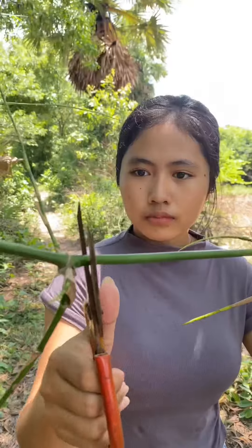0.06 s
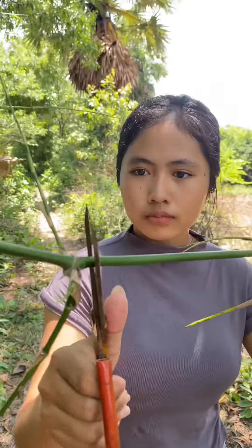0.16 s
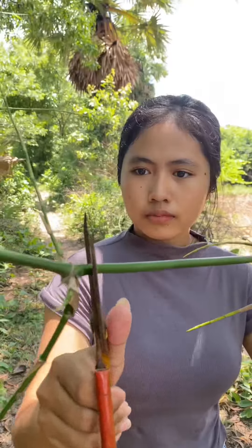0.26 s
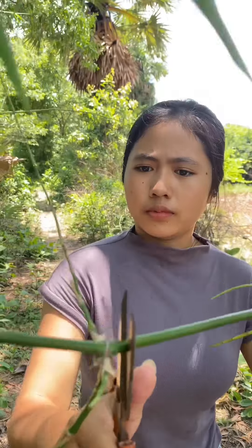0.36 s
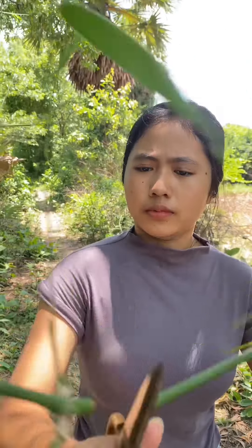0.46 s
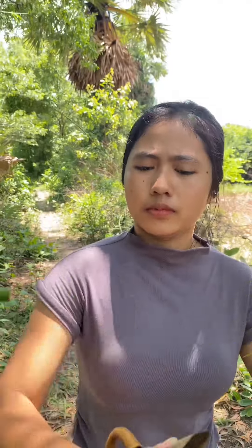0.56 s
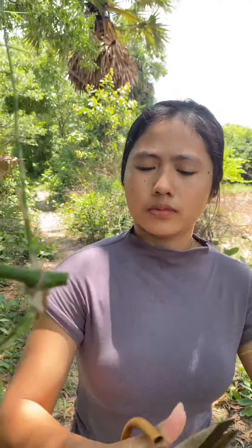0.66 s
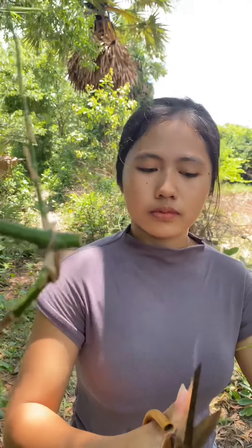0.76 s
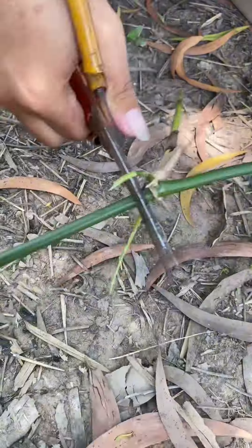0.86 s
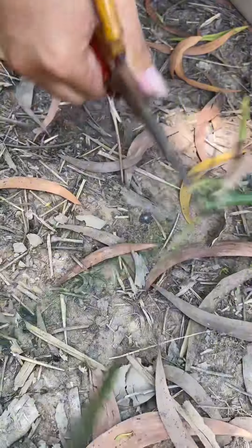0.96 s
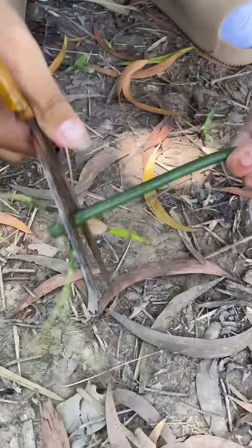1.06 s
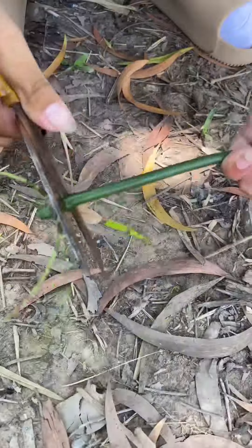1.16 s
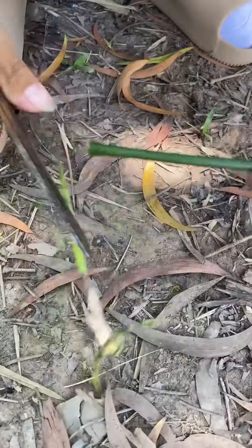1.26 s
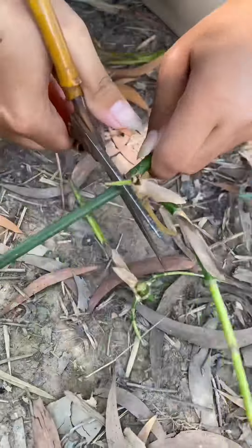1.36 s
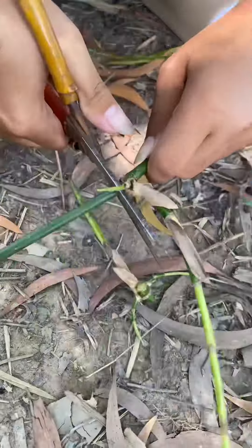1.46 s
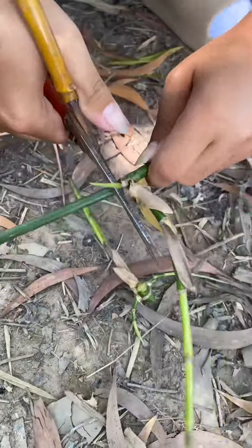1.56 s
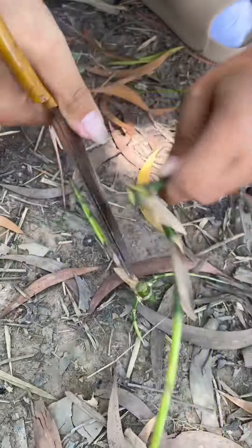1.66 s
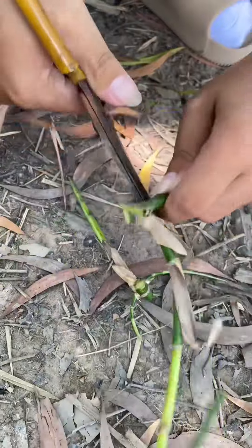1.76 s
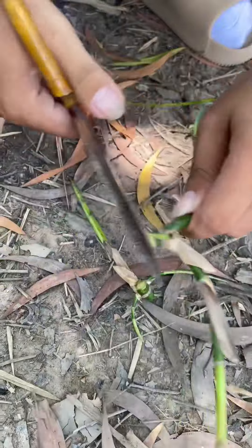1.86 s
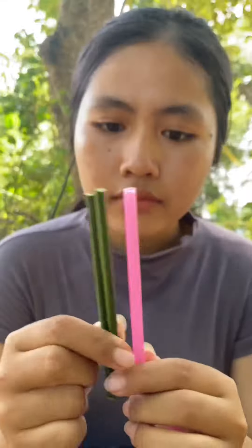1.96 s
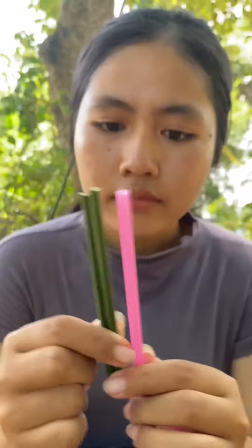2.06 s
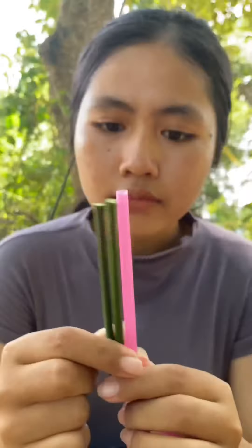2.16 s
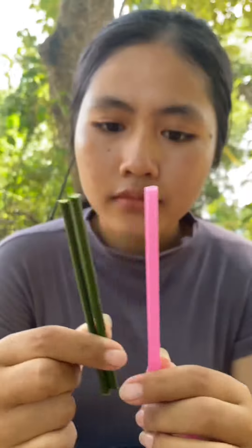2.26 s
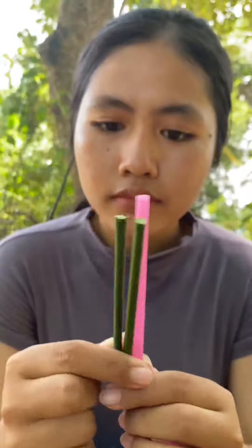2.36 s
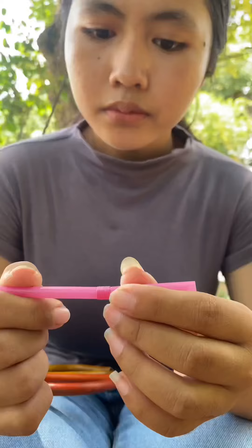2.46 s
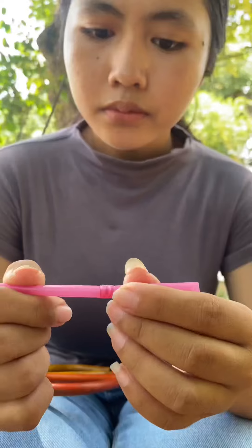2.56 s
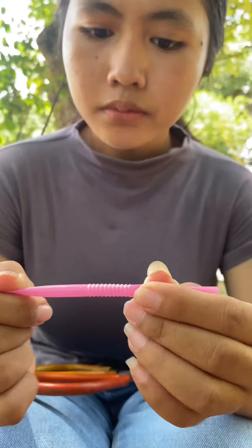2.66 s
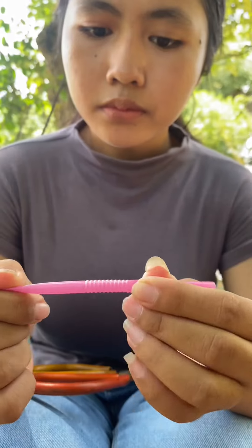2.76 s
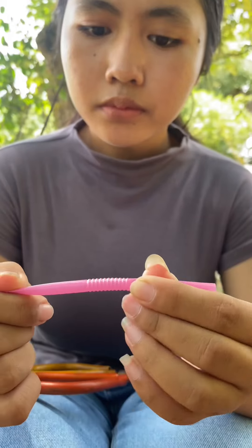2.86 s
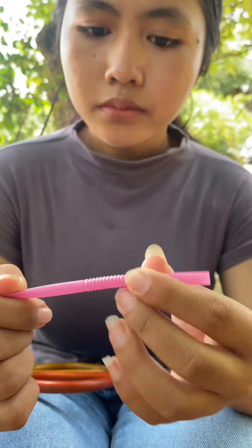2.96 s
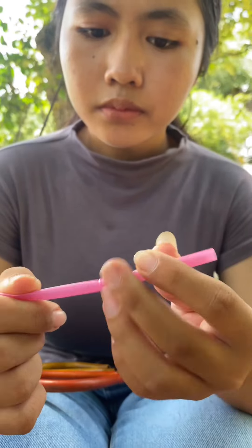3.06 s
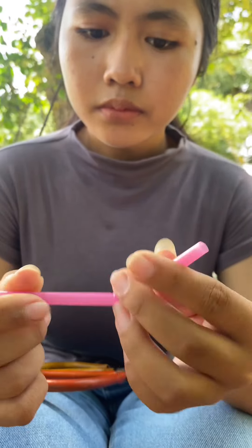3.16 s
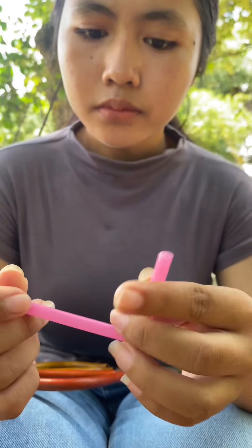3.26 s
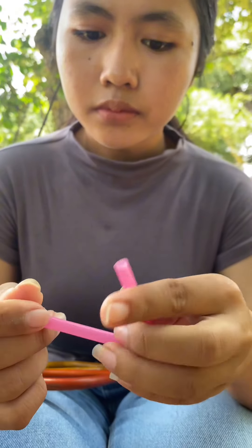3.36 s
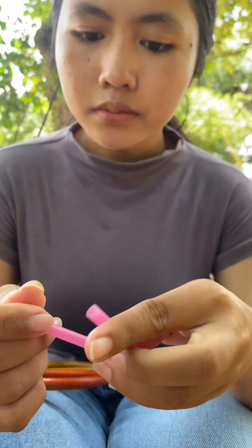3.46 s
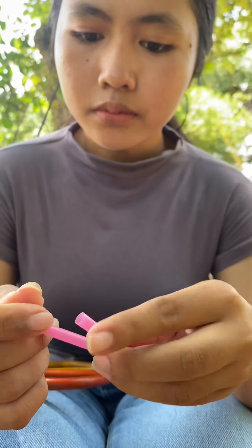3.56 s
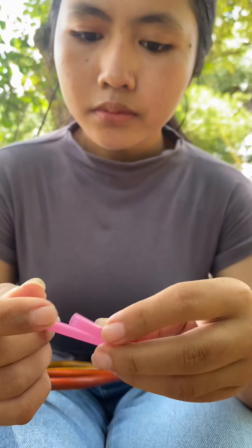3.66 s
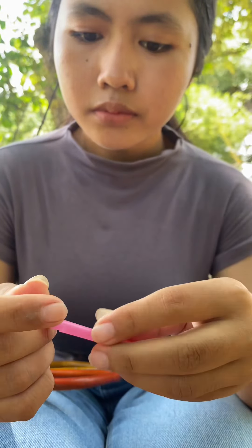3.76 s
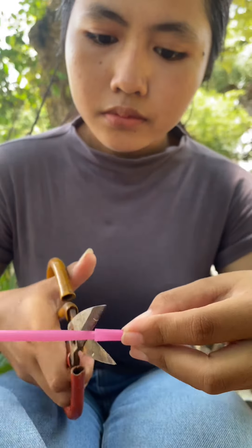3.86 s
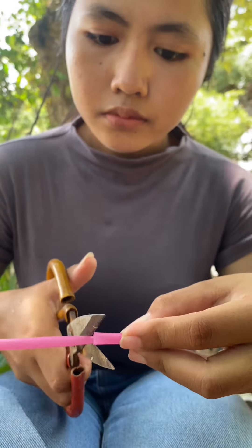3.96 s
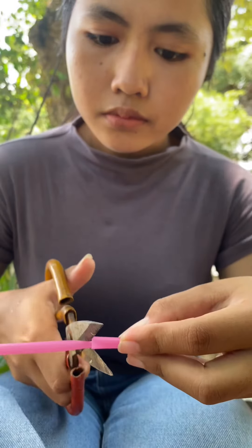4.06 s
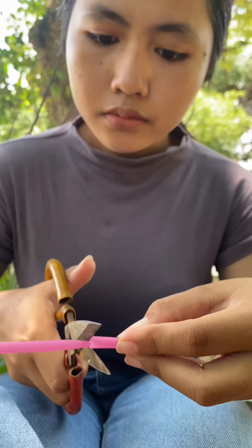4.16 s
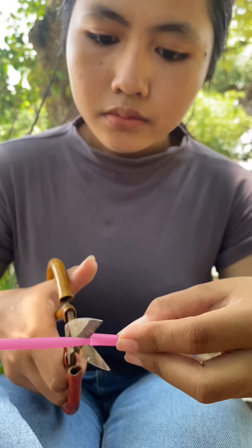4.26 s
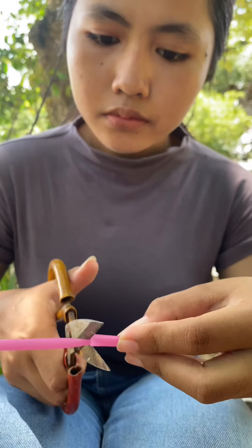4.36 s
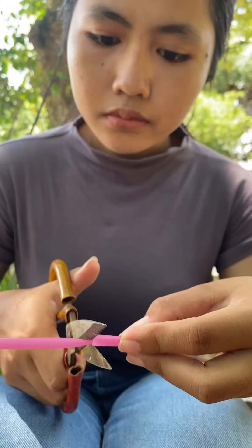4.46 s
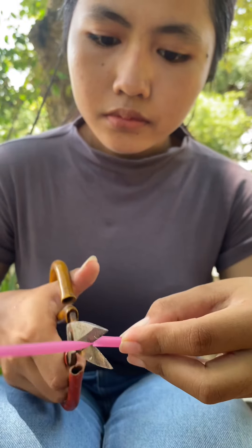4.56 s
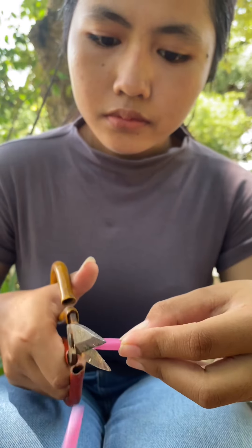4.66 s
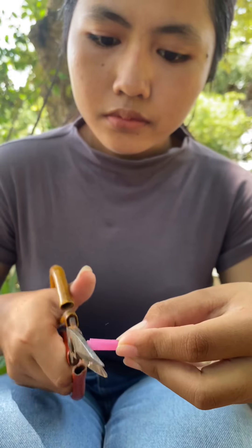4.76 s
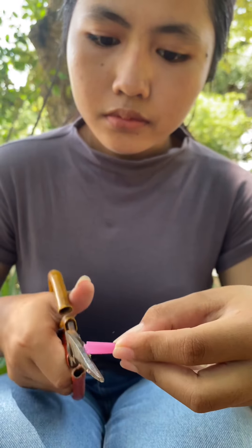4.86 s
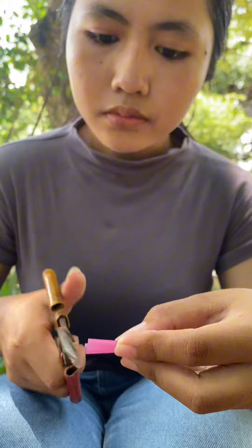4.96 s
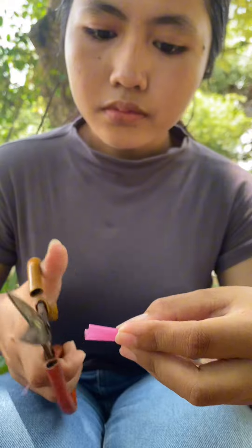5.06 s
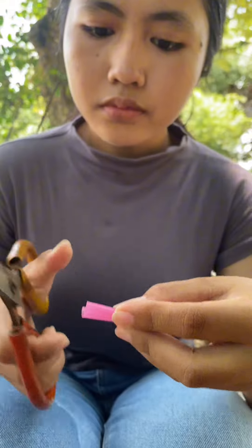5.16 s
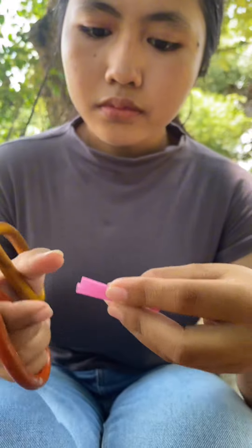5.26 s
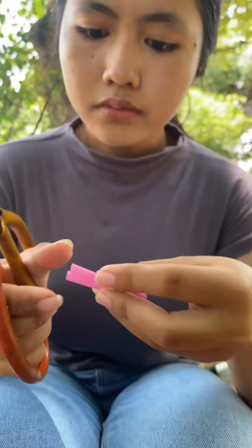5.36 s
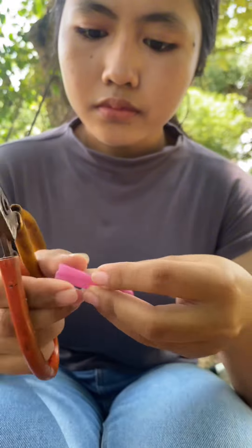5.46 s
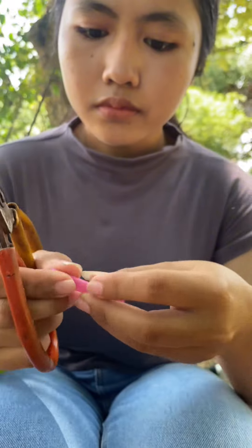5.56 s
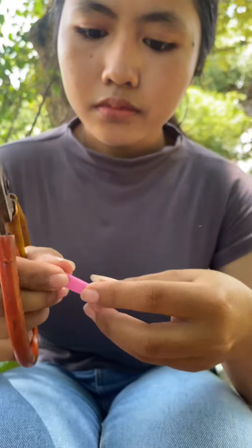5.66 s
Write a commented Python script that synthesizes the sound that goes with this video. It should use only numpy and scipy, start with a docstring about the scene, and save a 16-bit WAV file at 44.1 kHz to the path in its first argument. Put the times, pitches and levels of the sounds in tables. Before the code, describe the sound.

Four loud, dry snips with fibre crackle, brief steel ring and small low thuds come first, amid scratching dry leaves. Hollow finger taps follow, then a rapid plastic ratcheting burst, a quiet pause and two close straw cuts, the first bright and ringing, the second weaker. Close stereo phone pickup in open woodland, faint scatter from trees, gentle wind buffeting and one distant chirp.

```python
"""Shears in the forest

Close to a phone in a forest, hand shears snip four times through a green stem: fibre noise, cracks, steel tones, a thud.
Twigs and dry leaves tick and rustle as bursts and fading noise; the hinge slips; stem and straw tap in the fingers.
A plastic straw's pleats rip open in ringing pops, then the shears cut it twice and the pieces ring like pipes.
Light wind rumbles on the microphone ports over leaf hiss and a murmur, all shaped noise.
A far bird, a rough gliding tone, chirps once."""
import sys
import numpy as np
from scipy import signal
from scipy.fft import rfft, irfft
from scipy.io import wavfile
from scipy.ndimage import uniform_filter1d

SR = 44100
rng = np.random.default_rng(int(sys.argv[2]) if len(sys.argv) > 2 else 0)


def wav_out(sig):
    """Save sig, one row per channel (or a flat mono array), as 16-bit PCM at SR to the path in sys.argv[1]."""
    wavfile.write(sys.argv[1], SR, np.round(np.clip(np.atleast_2d(sig).T, -1, 1) * 32767).astype(np.int16))


N = 251483


def amp(db):
    """Amplitude factor of a level in dB."""
    return 10 ** (np.asarray(db) / 20)


def unit_rms(x):
    """Scales a signal to a root mean square of one."""
    return x / np.sqrt(np.mean(x ** 2) + 1e-20)


def read(points, hz, column=1):
    """Reads a table column at any frequency, straight between points on a log frequency axis."""
    columns = np.transpose(points)
    return np.interp(np.log(hz + 1), np.log(columns[0] + 1), columns[column])


def add(mix, s, sound):
    """Adds a sound into the mix at a time in seconds, cut off at the end."""
    part = mix[..., round(s * SR):][..., :sound.shape[-1]]
    part += sound[..., :part.shape[-1]]


def colour(x, points, tilt_db=0.):
    """Imposes a spectrum, tilted per octave about 4 kHz, as a causal filter, and keeps the power."""
    hz = np.fft.rfftfreq(len(x), 1 / SR)
    log_gain = np.log(amp(read(points, hz) + tilt_db * np.log2(hz / 4000 + .01)))
    # folding the cepstrum onto positive times gives minimum phase
    fold = irfft(log_gain, len(x))
    fold[1:len(x) // 2] *= 2
    fold[len(x) // 2 + 1:] = 0
    y = irfft(rfft(x) * np.exp(rfft(fold)), len(x))
    return y * np.sqrt(np.mean(x ** 2) / (np.mean(y ** 2) + 1e-30))


def ring(modes, t):
    """Decaying sines with chance starting phase, softened over the first instant."""
    tones = sum(amp(db - 60 * t / t60) * np.sin(2 * np.pi * (hz * t + rng.random()))
                for hz, db, t60 in modes)
    return tones * (1 - np.exp(-t / 0.000037))


def uneven_noise(count, grain_db, width):
    """White noise whose level wanders by chance over a width in samples."""
    grain = unit_rms(uniform_filter1d(rng.standard_normal(count), size=width))
    return rng.standard_normal(count) * amp(grain_db * grain)


def burst(t, decay_s):
    """A quick puff of uneven noise; its energy is set by the decay, not by chance."""
    shape = np.exp(-t / max(decay_s, 1e-4)) * (1 - np.exp(-t / .0001))
    puff = shape * uneven_noise(len(t), grain_db=3.0, width=12)
    return puff * np.linalg.norm(shape) / np.linalg.norm(puff) / 2


def bed(points, patchy_db):
    """Steady noise with drifting patches in time and pitch."""
    frames, hz = N // 256 + 5, np.fft.rfftfreq(1024, 1 / SR)
    real, imaginary, patches = rng.standard_normal((frames, 513, 3)).T
    patches = uniform_filter1d(patches, size=14, axis=0)  # along pitch
    patches = unit_rms(uniform_filter1d(patches, size=10, axis=1))  # along time
    spectrum = (real + 1j * imaginary) * amp(read(points, hz)[:, None] + patchy_db * patches)
    return unit_rms(signal.istft(spectrum, nperseg=1024, noverlap=768)[1][:N])


def stereo(mid, side):
    """Places the mid a little to the right and adds the side with opposite signs."""
    return amp([[-1.9], [1.9]]) * mid + np.array([side, -side])


def drift():
    """Slow chance swells of the background level, 1.5 to 10 a second."""
    t = np.arange(N) / SR
    swells = sum(np.sin(2 * np.pi * (hz * t + rng.random())) / np.sqrt(hz)
                 for hz in np.geomspace(1.5, 10, num=16))
    return amp(1.1 * unit_rms(swells))


# background around the phone, before drift and left-right balance; each row holds until the next:
# (time [s], leaf hiss level [dB], murmur level [dB])
BACKGROUND = [(0, -68.5, -68), (0.842, -65, -73), (1.24, -67, -72.5), (1.88, -59.5, -62.5),
              (2.492, -68, -69.5), (4.901, -70.5, -71)]


def background(column):
    """Steady level of hiss or murmur, gliding quickly from each step to the next."""
    start = np.transpose(BACKGROUND)[0]
    step = np.maximum(np.searchsorted(start, np.arange(N) / SR, "right") - 1, 0)
    level_db = np.transpose(BACKGROUND)[column][step]
    return amp(uniform_filter1d(level_db, round(0.014 * SR)))


# spectrum of the leaves around the phone: (frequency [Hz], relative density [dB])
LEAVES = [(650, -37), (1100, -8.5), (2800, -6), (3800, -6.5), (7150, -11), (10300, -16), (11300, -39),
          (14000, -72)]
# spectrum of their left-right part: (frequency [Hz], relative density [dB])
LEAVES_SIDE = [(650, -26.5), (1100, 1.5), (1520, -7.5), (2730, -1.5), (3730, -8.5), (11700, -11),
               (16000, -19)]


def leaves():
    """Leaf hiss is wide patchy noise; rustling adds to it in power, and the side is its own noise."""
    level = np.hypot(background(column=1) * drift(), rustle())
    return stereo(level * bed(LEAVES, 1.4), level * bed(LEAVES_SIDE, 1.5))


# spectrum of the low murmur of the woods: (frequency [Hz], relative density [dB])
MURMUR = [(140, -28.5), (230, -9.5), (376, -3), (468, -7), (624, -7), (1400, -13.5), (1820, -43),
          (3080, -120)]


def murmur():
    """The murmur is wide low noise, joined by the low part of each rustle."""
    level = np.hypot(background(column=2) * drift(), amp(-12.5) * rustle())
    return stereo(level * bed(MURMUR, 1.2), amp(4.5) * level * bed(MURMUR, 1.4))


# wind at the microphone, before left-right balance: (time [s], level [dB])
GUSTS = [(0, -58.5), (.8, -58.5), (.85, -51), (.95, -54), (1.1, -50), (1.15, -55), (1.27, -63), (1.34, -52),
         (1.5, -56), (1.63, -50), (1.7, -46), (1.76, -60.5), (1.84, -49), (1.9, -57.5), (1.98, -41.5),
         (2.1, -51.5), (2.35, -53.5), (2.5, -56.5), (5.7, -57)]
# spectrum of the wind on the ports: (frequency [Hz], relative density [dB])
WIND = [(12, -59.5), (20, -44), (25, -33), (40, -10.5), (70, 7.5), (103, -7), (140, -4), (184, -12.5),
        (330, -18.5), (430, -43), (730, -120)]


def wind():
    """Wind on the ports is low rumbling noise that follows the gusts, with a weaker side of its own."""
    time, level_db = np.transpose(GUSTS)
    level = amp(np.interp(np.arange(N) / SR, time, level_db))
    return stereo(level * bed(WIND, 1.3), amp(-10) * level * bed(WIND, 1.3))


# the two microphone ports, for near sounds; the scatter is scaled by clutter and chance:
# (frequency [Hz], left lead [rad], left minus right [dB], scatter [rad])
PORTS = [(100, 0.66, -0.5, 1), (391, .5, -7, 3.57), (850, 1.5, 3, 1.97), (1976.4, -0.64, -2, 1.43),
         (3520, 2, -2, 2.5), (5710, 1.09, -2.5, -1.86), (8900, 0.93, 3, 2.8), (11550, 1.5, 1, -0.6),
         (12900, 4, 0, -0.4)]


def ports(near, clutter):
    """Two ports a finger apart: treble arrives shifted; clutter near the source scrambles the shift."""
    hz = np.fft.rfftfreq(N, 1 / SR)
    lead, pan_db, scatter = (read(PORTS, hz, column=k) for k in (1, 2, 3))
    wobble = np.interp(hz, np.arange(60) * SR / 120, rng.standard_normal(60))
    turn = amp(pan_db / 2) * np.exp(.5j * (lead + clutter * scatter * wobble))
    return irfft(rfft(near) * np.array([turn, 1 / turn]), N)


# dry scratches of twigs, leaves and handles close by:
# (time [s], level [dB], strongest frequency [Hz], decay constant [s])
SCRATCHES = [(0.348, -50, 7000, 0.0078), (0.514, -40, 4660, 0.004), (0.733, -45.5, 5050, 0.0066),
             (0.971, -33, 6100, 0.0085), (.992, -42, 6440, 0.0032), (1.026, -44, 6000, 0.0062),
             (1.057, -36.5, 1010, 0.0014), (1.084, -44, 7100, 0.0027), (1.202, -29.5, 6500, 0.0032),
             (1.235, -34, 1860, 0.0047), (1.335, -35, 7040, 0.012), (1.384, -40.5, 7400, 0.0022),
             (1.406, -33.5, 7000, 0.0026), (1.346, -41, 6000, 0.0065), (1.616, -43.5, 7100, 0.022),
             (1.681, -37, 6000, 0.0074), (1.687, -32, 5440, 0.0077), (1.696, -31, 5570, 0.0086),
             (1.759, -47.5, 4800, 0.016), (1.809, -47.5, 5400, 0.016), (1.839, -40.5, 7500, 0.0073),
             (1.86, -23, 7450, 0.0032), (1.869, -30, 5500, 0.0144), (2.077, -38.5, 5660, 0.0042),
             (2.295, -42, 2800, 0.0056), (2.332, -50, 900, 0.0079), (2.438, -48, 640, 0.013),
             (2.756, -43.5, 694, 0.0072), (2.8, -50.5, 4000, .008), (2.982, -52, 6120, 0.0069),
             (3.081, -32.5, 6300, 0.0013), (4.611, -31.5, 1480, 0.0021), (4.886, -43, 5000, 0.0075),
             (4.901, -45, 4970, 0.0055), (5.2, -52, 3000, 0.0055), (5.248, -52.5, 2900, 0.0035),
             (5.398, -50, 5050, .003), (5.568, -46, 7330, 0.0032)]


def scratches():
    """Each dry scratch is a noise burst about one frequency, dulling by 6.5 dB an octave above it."""
    out, t = np.zeros(N), np.arange(2048) / SR
    for s, db, hz, decay_s in SCRATCHES:
        treble_db = -6.5 * np.log2(8500 / hz)
        spectrum = [(100, -44), (min(hz / 2, 1200), -9), (hz, 0), (8500, treble_db),
                    (11000, treble_db - 1.5), (16000, treble_db - 23.0)]
        add(out, s, amp(db) * colour(burst(t, decay_s), spectrum))
    return out


# stem cuts close to the phone; the hum is relative to the crush:
# (blades bite [s], stem parts [s], crush level [dB], tail level [dB], tail t60 [s],
#  thud level [dB], steel hum [dB])
CUTS = [(0.402, 0.423, -24, -27, 0.059, -34.5, 2.5), (0.886, 0.9105, -22, -35, 0.014, -17, -12.5),
        (1.169, 1.194, -21.5, -34.5, 0.018, -19, -11), (1.635, 1.664, -17, -24.5, 0.03, -21, -17)]
# lowest steel tone of each cut, as the grip varies: (frequency [Hz])
GRIP_HZ = [2450, 2150, 2170, 2180]
# spectrum of crushed and cracking fibre: (frequency [Hz], relative density [dB])
FIBRE = [(80, -53.5), (290, -20), (500, -12.5), (780, -1.5), (1100, -13.5), (1530, -10.5), (2330, -5.5),
         (2770, -3.5), (3390, -5), (6060, 0.5), (7210, -3.5), (7860, -1), (11100, -8), (12700, -14),
         (15100, -17), (16000, -26)]
BLADE_T60_S = .011  # of the lowest steel tone
THUD_START_HZ, THUD_SINK_S = 301.17, 0.0072  # the pitch halves after the sink time


def stem_cuts():
    """Fibres crush louder as the blades close and hum through the steel; a sinking thud ends each cut."""
    out, t = np.zeros(N), np.arange(4096) / SR
    thud_turns = THUD_START_HZ * THUD_SINK_S * np.log(1 + t / THUD_SINK_S)
    # the thud sinks in pitch as the stem swings free
    thud = np.sin(2 * np.pi * thud_turns) * np.exp(-t / 0.0018)
    for (bite, part, crush_db, tail_db, t60, thud_db, hum_db), grip_hz in zip(CUTS, GRIP_HZ):
        closing = np.clip(t / (part - bite), 0, 1)
        crush = amp(crush_db) * closing ** 2.1
        tail = amp(tail_db - 60 * (t - part + bite) / t60)
        shape = np.where(closing < 1, crush, tail)
        fibres = uneven_noise(len(t), grain_db=4.5, width=25)
        blade = ring([(grip_hz, 0, BLADE_T60_S)], t)
        hum = signal.fftconvolve(unit_rms(fibres) * shape, blade / np.linalg.norm(blade))
        add(out, bite, colour(fibres, FIBRE) * shape + amp(hum_db) * hum[:len(t)])
        add(out, part + 0.00021, amp(thud_db) * thud)
    return out


# foliage and fingers rustle on after a movement: (peak time [s], peak level [dB], t60 [s])
RUSTLES = [(.43, -56, 1.64), (0.872, -58.5, 0.96), (1.05, -58, 0.15), (1.171, -48.5, 0.26),
           (1.68, -59.5, 0.49), (2.681, -62, 0.7), (3.98, -84, 1.3), (4.718, -60.5, 1.06),
           (5.501, -70, 4.5)]


def rustle():
    """Level of the rustling: a quick rise to each peak and a slow fade, summed in power."""
    t, power = np.arange(N) / SR, np.zeros(N)
    for s, db, t60 in RUSTLES:
        rise = np.clip((t - s) / .015 + 1, 0, 1)
        power += (rise * amp(db - 60 * np.maximum(t - s, 0) / t60)) ** 2
    return np.sqrt(power)


# cracks as the stem parts and the blades meet:
# (time [s], level [dB], steel ring level [dB], brightness [dB per octave])
CRACKS = [(0.418, -14.5, -23, -4.5), (0.42, -1, -7, 0), (0.4212, -5.5, -8.5, -1.5), (.9072, -4, -10.5, 0),
          (.9095, -4.5, -13, 1), (1.1889, -3, -21.5, 1), (1.1913, 1.5, -21.5, -1.5), (1.660, 1, -23.5, 4.5),
          (1.6635, -7, -16, -5.5), (1.6683, -22, -29, 2)]
# upper tones of the steel: (frequency [Hz], relative level [dB], t60 [s])
STEEL = [(4330, -14.5, 0.016), (5260, -3, 0.0042), (6140, -2, 0.016), (7700, -11, .006)]


def stem_cracks():
    """Each crack is a short burst of fibre noise that rings the steel."""
    out, t = np.zeros(N), np.arange(4096) / SR
    for s, db, steel_db, tilt_db in CRACKS:
        grip_hz = [hz for cut, hz in zip(CUTS, GRIP_HZ) if cut[0] < s][-1]
        # the lowest tone has a faint, slightly higher twin that rings on
        tones = [(grip_hz, 0, BLADE_T60_S), (grip_hz + 60, -30, .09), *STEEL]
        crack = colour(burst(t, 0.00083), FIBRE, tilt_db)
        add(out, s, amp(db) * crack + amp(steel_db) * ring(tones, t))
    return out


def trees(x):
    """Short scatter from ground and trunks: fading noise taps with the bass thinned."""
    t = np.arange(8000) / SR
    taps = rng.standard_normal((2, len(t))) * amp(-60 * t / 0.26) * (t > .003)
    taps = signal.lfilter([1, -1], [1, -.9], taps)
    return signal.fftconvolve(x[None], taps / np.linalg.norm(taps[0]), axes=1)[:, :N]


# hollow taps of stem and straw in the fingers:
# (time [s], level of knock and ring [dB], ring frequency [Hz], ring t60 [s])
TAPS = [(1.059, -39, 784, 0.09), (1.351, -49.5, 890, 0.063), (2.075, -29.5, 931, 0.057),
        (2.318, -43, 942, 0.08), (3.123, -32.5, 904, 0.044), (3.998, -40, 2443, 0.0153),
        (4.681, -38.5, 2080, 0.015), (4.743, -31, 1494, 0.013), (4.899, -36, 2134, 0.037),
        (5.397, -46.5, 1660, 0.036), (5.475, -53.5, 1666, .03), (5.571, -47, 1636, 0.043)]


def taps():
    """Each tap mixes a dull knock with a hollow ring of three tones."""
    out, t = np.zeros(N), np.arange(2048) / SR
    ring_share = 0.43
    for s, db, hz, t60 in TAPS:
        spectrum = [(300, -30), (hz / 2, -9), (hz, 0), (hz * 2.3, -10), (7500, -32), (16000, -60)]
        knock = colour(burst(t, 0.003), spectrum)
        hollow = ring([(hz, 0, t60), (hz * 2, -9, 0.76 * t60), (hz * 2.9, -10, 0.29 * t60)], t)
        add(out, s, amp(db) * ((1 - ring_share) * knock + ring_share * hollow))
    return out


# the stiff hinge slips as the blades open; the ring is relative to the slip:
# (time [s], level [dB], decay constant [s], ring of the handles [dB])
SLIPS = [(1.452, -42, .0015, -14), (1.473, -52, 0.0041, -1), (1.485, -43, 0.0056, -15),
         (1.513, -39.5, 0.0034, -16.5), (1.534, -41, .003, -13), (1.546, -33, 0.0022, -14),
         (1.5597, -31.5, 0.0023, -25.5), (1.5628, -30.5, 0.0023, -13.5), (1.573, -37.5, 0.0056, -10)]
# spectrum of a slip: (frequency [Hz], relative density [dB])
SLIP = [(300, -45), (1200, -22), (4500, -14), (7600, -5), (11000, -6), (16000, -19)]
# tones of the handles: (frequency [Hz], relative level [dB], t60 [s])
HANDLES = [(1569, -4.5, 0.016), (2685, -2, 0.017)]


def hinge():
    """Each slip of the hinge is a bright noise burst that rings the handles."""
    out, t = np.zeros(N), np.arange(2048) / SR
    for s, db, decay_s, handles_db in SLIPS:
        slip = colour(burst(t, decay_s), SLIP)
        add(out, s, amp(db) * (slip + amp(handles_db) * ring(HANDLES, t)))
    return out


# pleats popping open close to the phone; the tube ring is relative to the pop:
# (time [s], level [dB], strongest frequency [Hz], ring of the tube [dB])
PLEATS = [(2.6245, -26.5, 1900, -9), (2.6328, -14.5, 2780, -20.5), (2.637, -18.5, 2680, -11.5),
          (2.641, -13, 1640, -21), (2.6445, -14, 2920, -15), (2.6476, -15, 3280, -10),
          (2.6557, -10.5, 2010, -18), (2.661, -7, 2416, -10.5), (2.6650, -4.5, 5250, -15),
          (2.6674, -2.5, 5420, -19.5), (2.6713, -6.5, 2256, -15)]
# tones of the long straw: (frequency [Hz], relative level [dB], t60 [s])
TUBE = [(799, -7.5, 0.014), (874, -5, 0.028), (1224, -7.5, 0.0053), (1640, -14.5, 0.012),
        (2571, -2.5, 0.021)]


def straw_pleats():
    """Each pleat snaps over with a short tone of its own and rings the tube."""
    out, t = np.zeros(N), np.arange(2048) / SR
    for s, db, hz, tube_db in PLEATS:
        spectrum = [(80, -30), (250, -11), (hz / 2, -7), (hz, 0), (6500, -4), (10000, -12), (16000, -36)]
        snap = colour(burst(t, .0011), spectrum)
        pop = ring([(hz, -6, 0.0049)], t)
        add(out, s, amp(db) * (snap + pop + amp(tube_db) * ring(TUBE, t)))
    return out


def chirp():
    """A faint, rough whistle from afar whose pitch and level arch together."""
    length_s, low_hz, arch_hz = 0.054, 3500, 452
    out, arch = np.zeros(N), np.sin(np.pi * np.arange(0, 1, 1 / (length_s * SR)))
    rough = unit_rms(uniform_filter1d(rng.standard_normal(len(arch)), size=60))
    whistle = np.sin(2 * np.pi * np.cumsum(low_hz + arch_hz * arch) / SR)
    add(out, 4.115, amp(-66) * arch * (0.85 + 0.65 * rough) * whistle)
    return out


# straw cuts close to the phone; tones two to five are relative to the lowest:
# (time [s], pipe level [dB], lowest tone [Hz], tones two to five [dB, four columns],
#  lowest tone t60 [s], crack level [dB], stretch of the upper tones [fraction per step])
PIPES = [(4.6935, 0.5, 2098, -3.5, -12.5, -14.5, -55.5, 0.026, -5, .012),
         (4.7340, -12.5, 1508, -17, 9.5, -28.5, -15.5, 0.015, -14, 0.032)]


def straw_cuts():
    """Each cut cracks and the piece rings as a pipe: five tones, slightly stretched, higher ones shorter."""
    out, t = np.zeros(N), np.arange(2048) / SR
    spectrum = [(600, -43.5), (1300, -5), (6000, -0.5), (9500, -21.5), (12000, -17.0), (16000, -51.0)]
    for s, db, hz, *upper_db, t60, crack_db, stretch in PIPES:
        tones = [(k * hz * (1 + stretch * (k - 1)), tone_db, t60 / k ** 0.55)
                 for k, tone_db in enumerate([0, *upper_db], start=1)]
        pipe = ring(tones, t) * (1 - np.exp(-t / 0.0021))
        crack = colour(burst(t, 0.0019), spectrum)
        add(out, s, amp(db) * pipe + amp(crack_db) * crack)
    return out


# tones of the cut straw under the fingers: (frequency [Hz], relative level [dB], t60 [s])
RUB_TONES = [(1627, 4.5, 0.024), (3400, -20.5, 0.0097), (5220, 2.5, 0.0091)]


def straw_rub():
    """Fingers slide along the cut straw: tiny chance slips each ring its tones."""
    out, t = np.zeros(N), np.arange(2048) / SR
    from_s, to_s, slips_per_s = 5.46, 5.63, 220
    chance, size = rng.random((round((to_s - from_s) * SR), 2)).T
    slips = (chance < slips_per_s / SR) * (2 * size - 1)
    add(out, from_s, amp(-62.5) * signal.oaconvolve(slips, ring(RUB_TONES, t)))
    return out


def scene():
    """Near sounds through the two ports, their scatter from the trees, the woods, wind and bird."""
    stem = stem_cuts() + stem_cracks()
    straw = straw_pleats() + straw_cuts()
    ticks = scratches() + taps() + hinge() + straw_rub()
    near = ports(stem, clutter=1.1) + ports(straw + ticks, clutter=0.32)
    scatter = amp(-31) * trees(stem + amp(1.5) * straw)
    return near + scatter + leaves() + murmur() + wind() + chirp()


def record(dry):
    """A bass roll-off that keeps the lowest rumble thin, then the band limit."""
    low_hz, edge_hz = 35.36, 16500
    roll_off = signal.butter(N=2, Wn=low_hz, btype="high", fs=SR, output="sos")
    band_limit = signal.firwin(511, edge_hz, window=("kaiser", 9), fs=SR)
    return signal.oaconvolve(signal.sosfilt(roll_off, dry), band_limit[None], "same")


dry = scene()
out = record(dry)
wav_out(out)
```